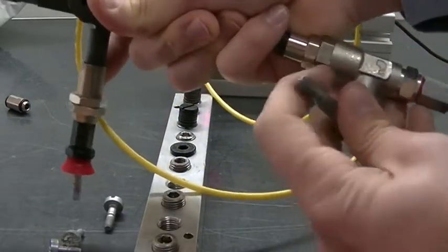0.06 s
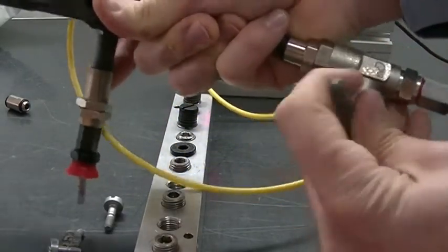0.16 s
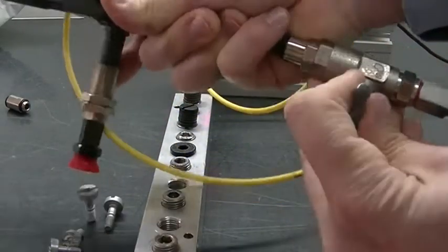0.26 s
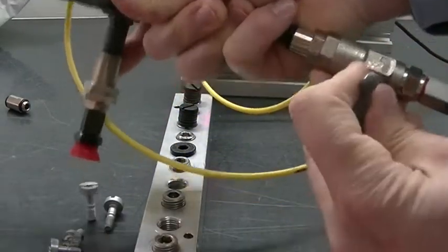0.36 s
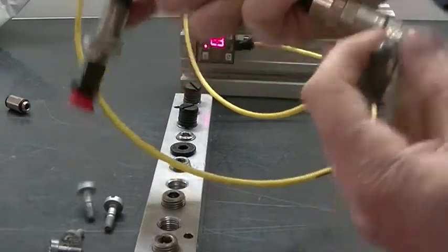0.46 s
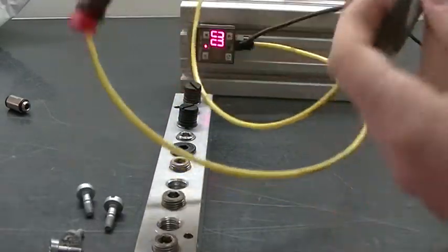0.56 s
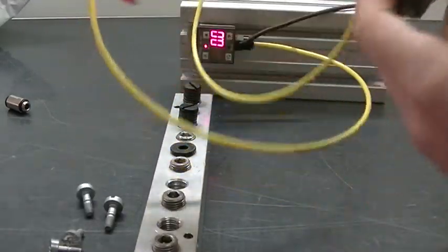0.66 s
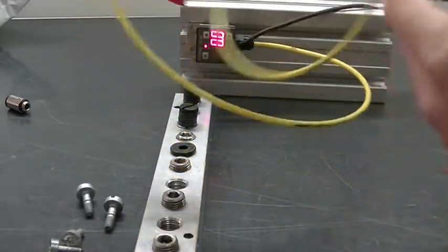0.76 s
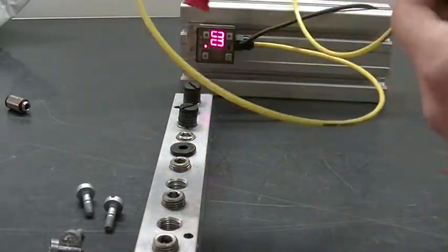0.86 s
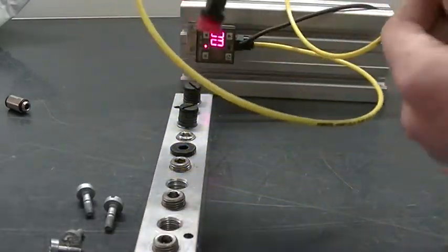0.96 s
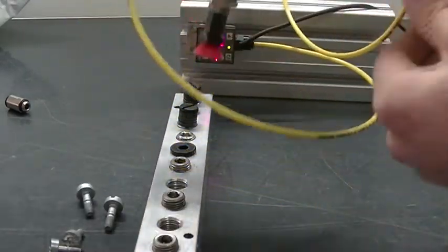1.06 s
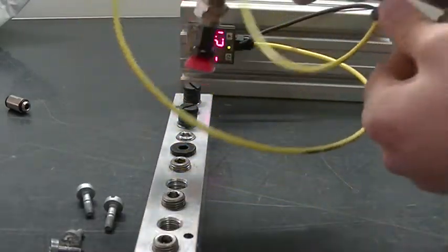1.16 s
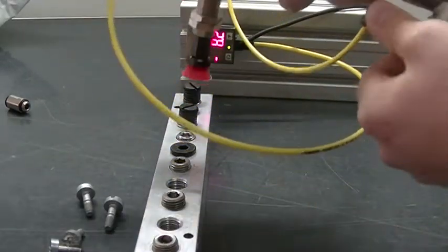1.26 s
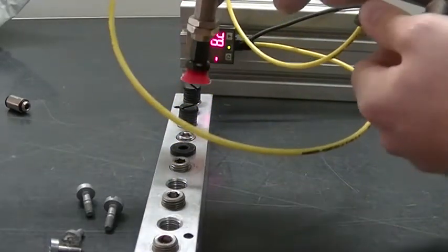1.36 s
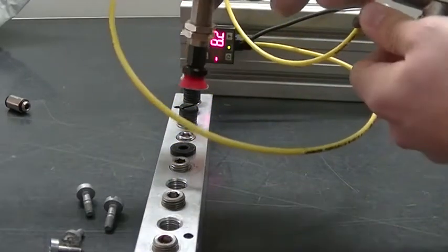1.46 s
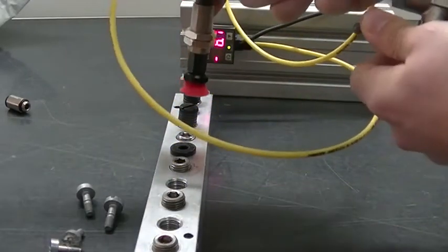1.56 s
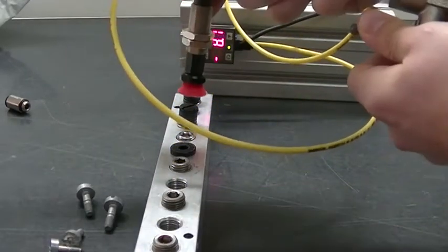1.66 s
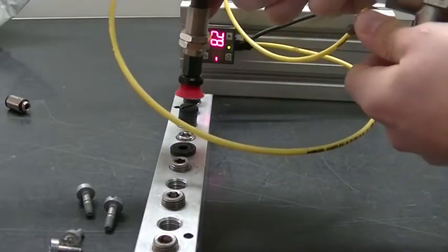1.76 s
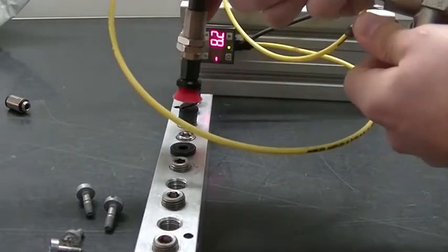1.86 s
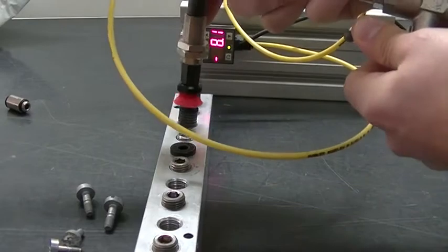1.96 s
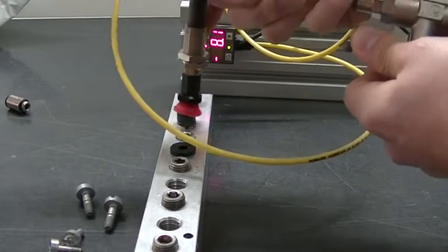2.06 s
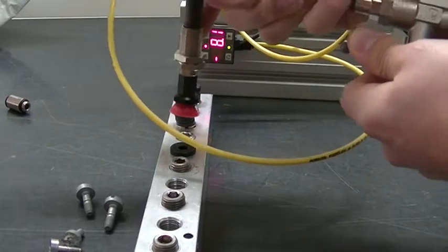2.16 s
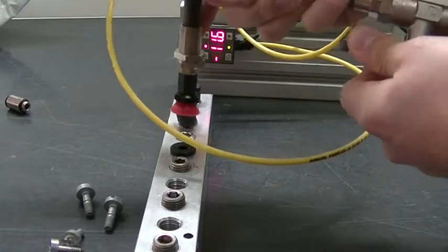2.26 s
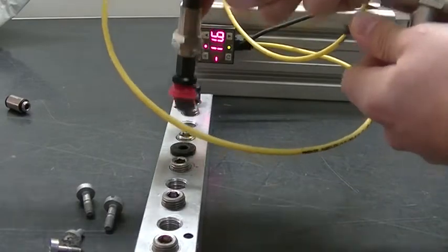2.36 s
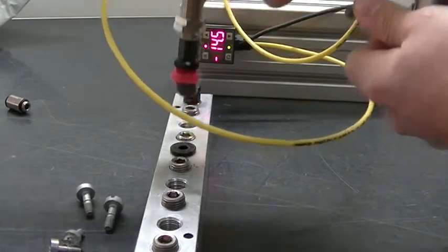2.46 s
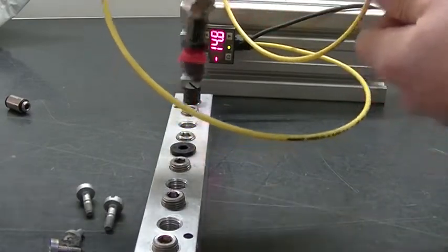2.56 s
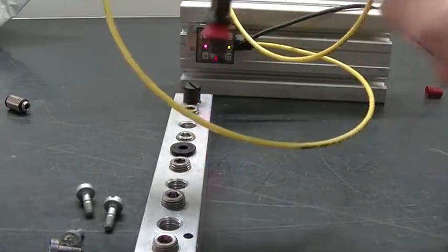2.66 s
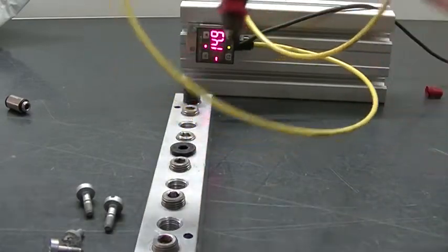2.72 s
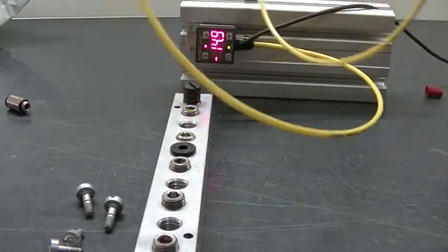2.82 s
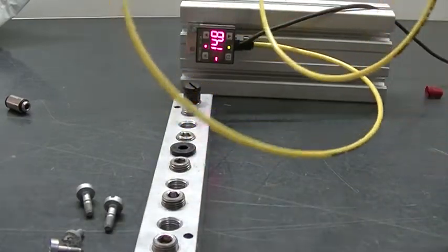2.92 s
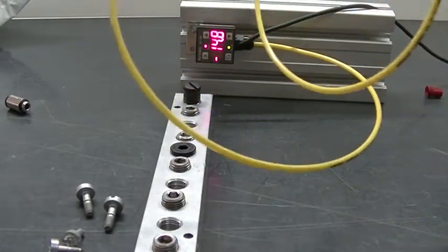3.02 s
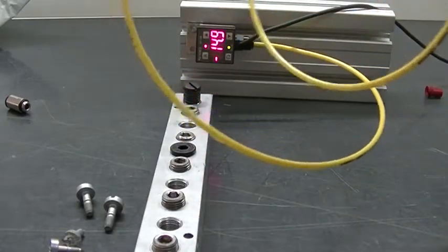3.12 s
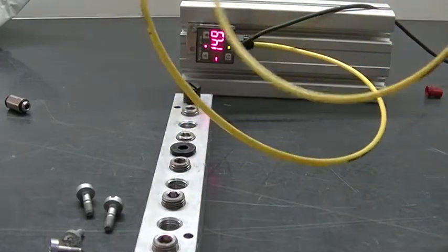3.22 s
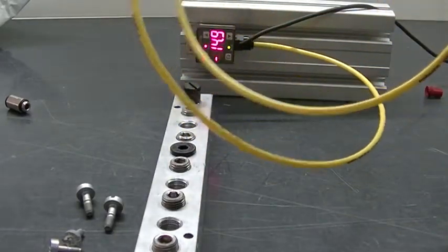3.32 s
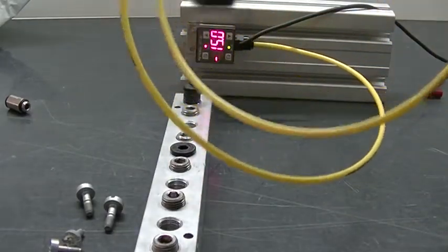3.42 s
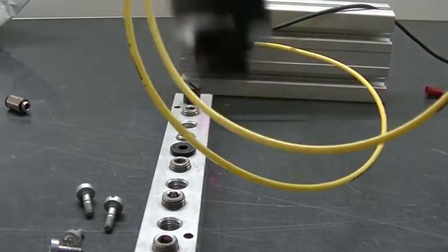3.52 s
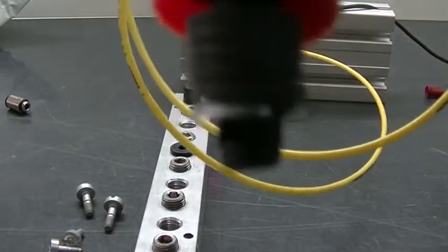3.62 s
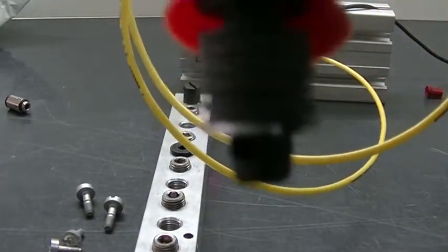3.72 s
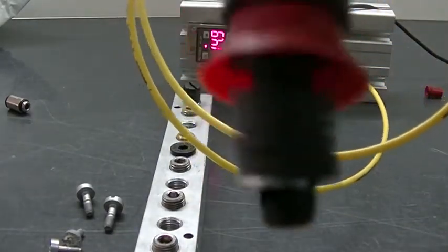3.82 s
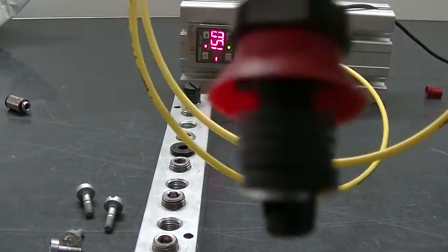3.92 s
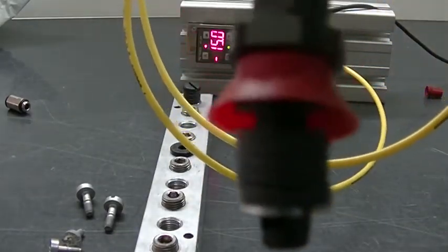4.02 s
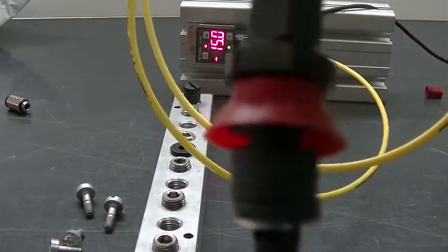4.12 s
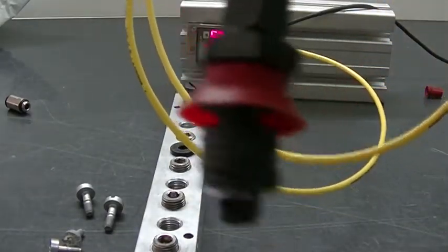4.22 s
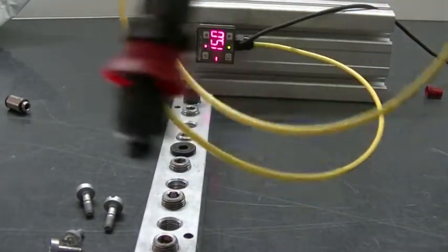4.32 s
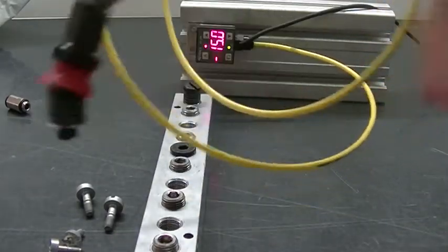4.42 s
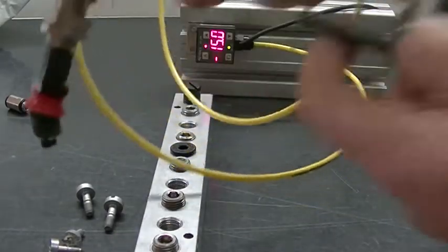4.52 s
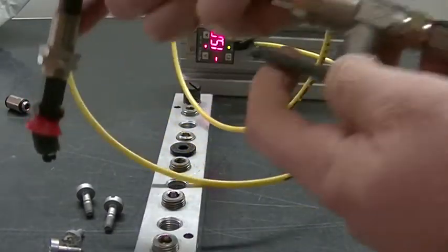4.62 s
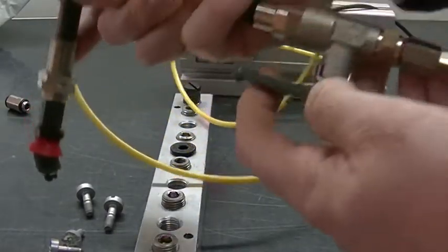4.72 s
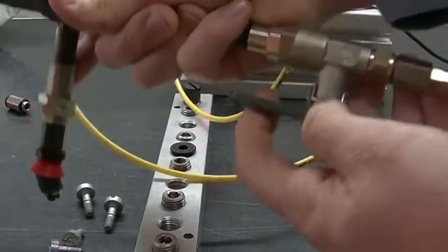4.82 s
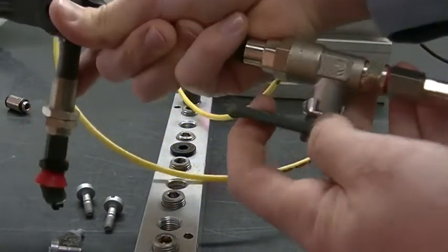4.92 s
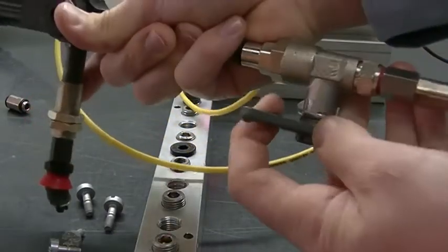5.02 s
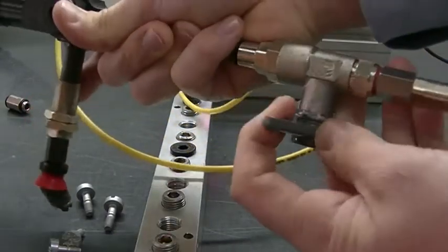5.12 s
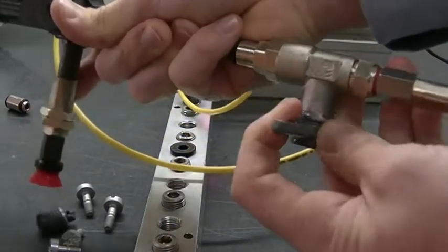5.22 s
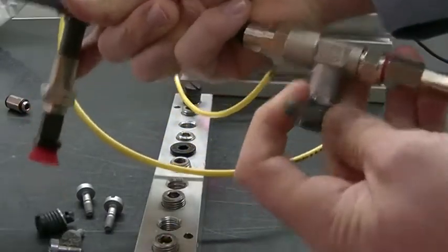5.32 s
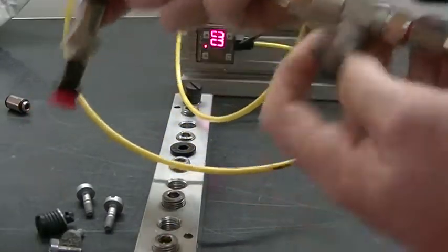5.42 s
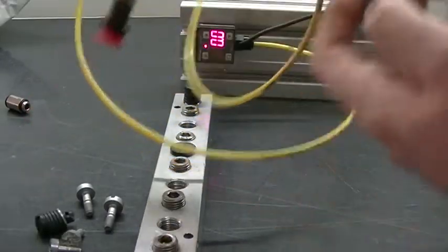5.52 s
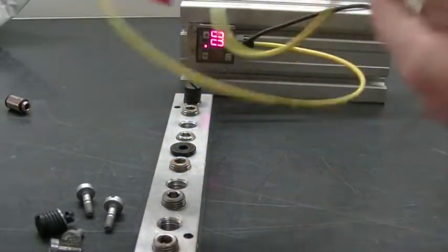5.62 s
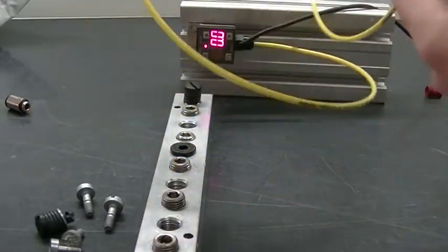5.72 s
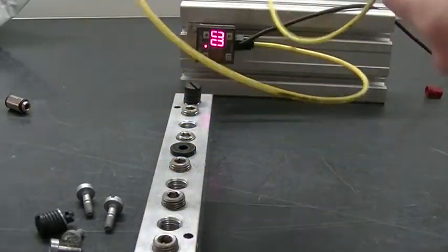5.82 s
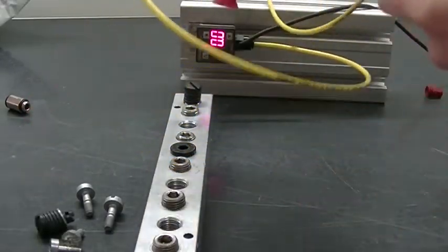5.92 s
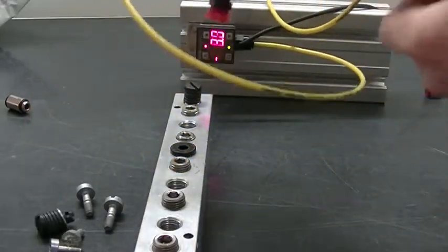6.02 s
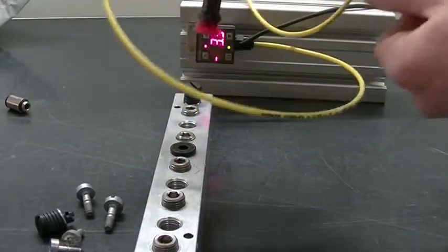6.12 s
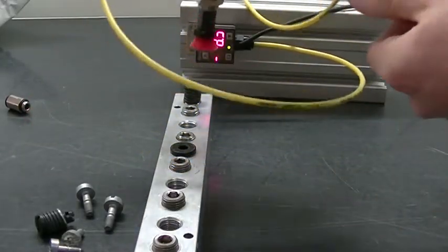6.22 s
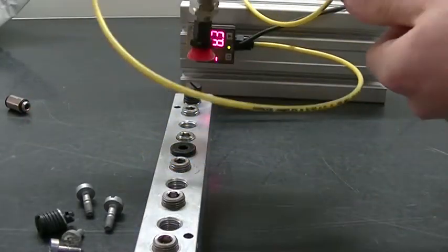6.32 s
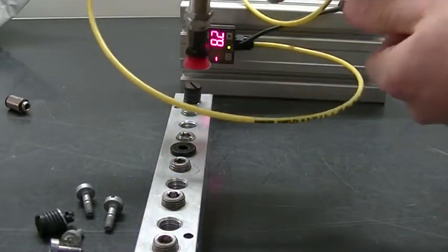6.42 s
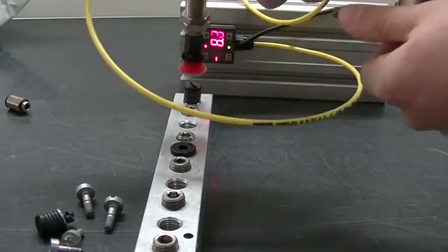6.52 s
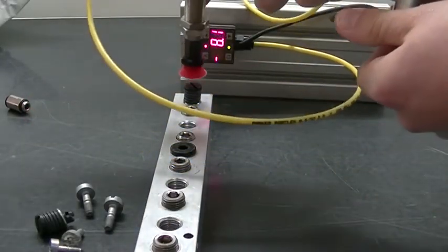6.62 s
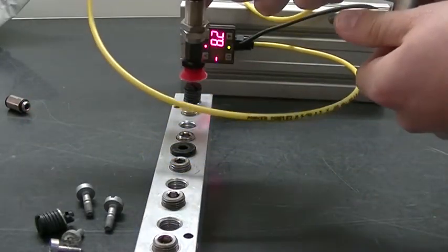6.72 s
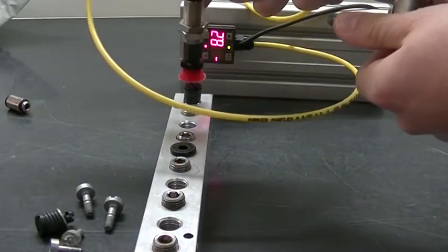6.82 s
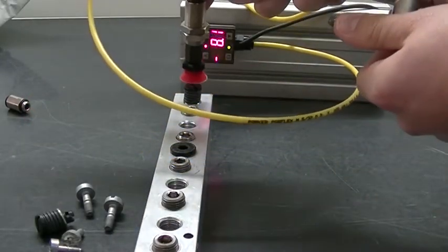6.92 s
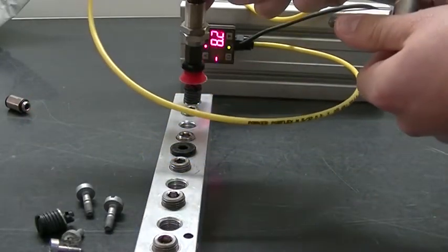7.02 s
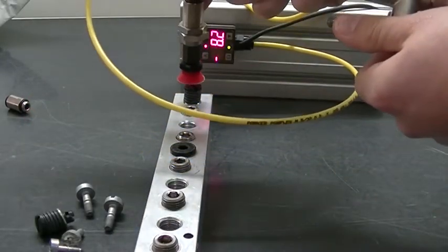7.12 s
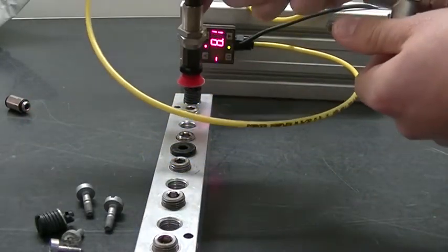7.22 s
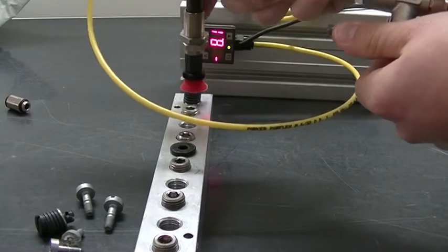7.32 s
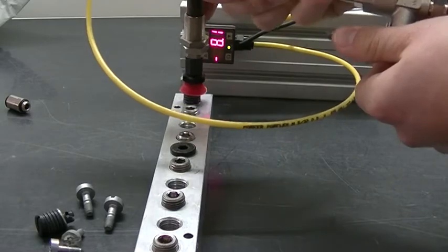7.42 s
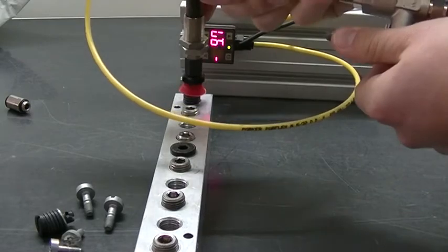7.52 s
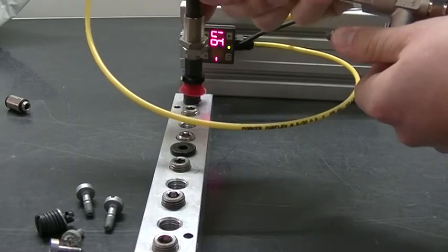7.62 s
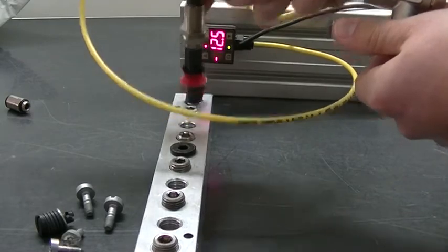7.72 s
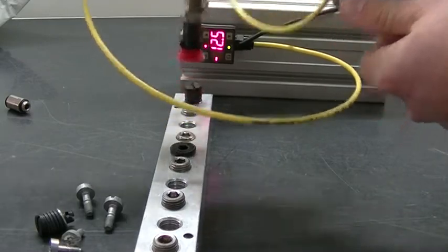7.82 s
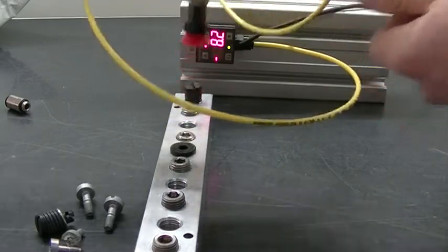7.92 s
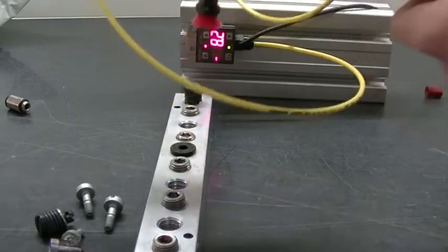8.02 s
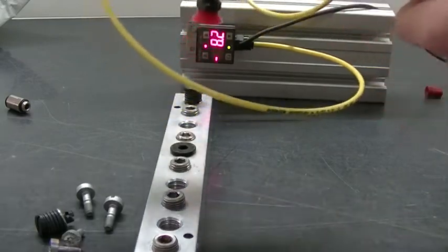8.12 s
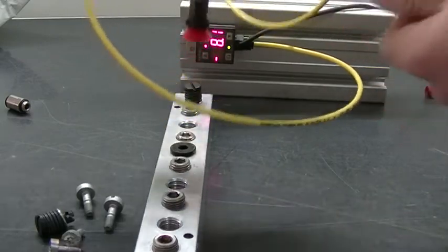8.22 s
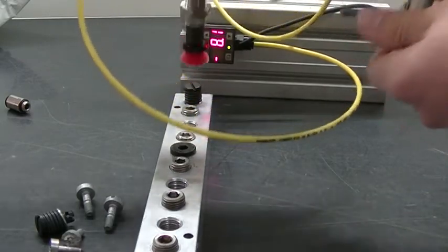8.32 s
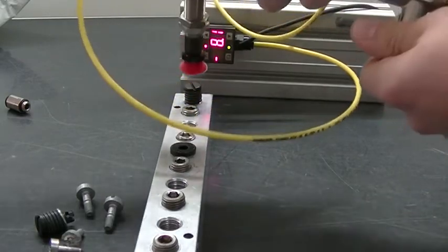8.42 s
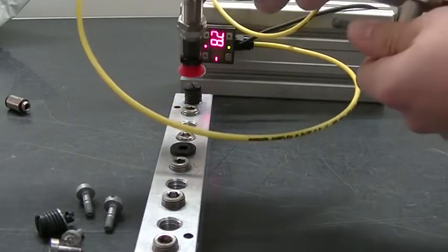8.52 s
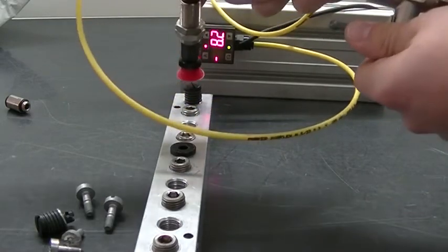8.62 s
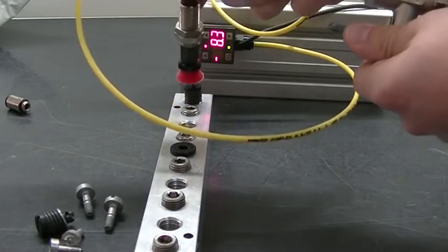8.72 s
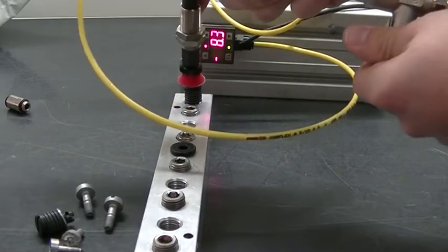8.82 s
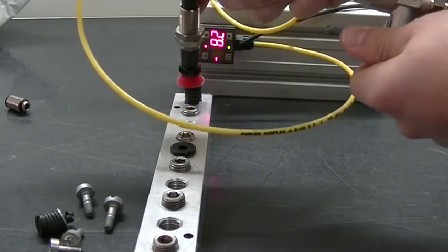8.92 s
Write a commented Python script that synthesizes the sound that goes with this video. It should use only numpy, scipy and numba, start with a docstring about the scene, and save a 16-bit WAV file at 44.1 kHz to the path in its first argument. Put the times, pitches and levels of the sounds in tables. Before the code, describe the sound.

Three bursts of loud air hiss from a suction cup tool, with a small part clattering onto the bench in each pause.

```python
"""Compressed air roars in bursts from a hand-held vacuum ejector above a workbench.
The turbulent exhaust is combed by moving echoes off bench and wall; air sizzles into the suction cup.
Twice the valve shuts: the hall rings out, and the part held by the cup drops and bounces.
Small steel parts click and the hose rustles in the pauses. Ventilation and mains hum lie beneath;
a compressor ducks the loud stretches."""
import sys
import numpy as np
from scipy import signal
from scipy.fft import rfft, irfft, next_fast_len
from scipy.io import wavfile
from numba import njit

SR = 44100
rng = np.random.default_rng(int(sys.argv[2]) if len(sys.argv) > 2 else 0)


def unload_audio(sound):
    """Save the sound as a 16-bit wav file, at the path given as the first command line argument."""
    columns = np.transpose(np.atleast_2d(sound))
    # keep every value between -1 and 1, then stretch to whole-number steps
    steps = np.round(np.clip(columns, -1, 1) * 32767)
    wavfile.write(sys.argv[1], SR, steps.astype(np.int16))


N = 395577
TIME = np.arange(N) / SR
WORK_HEIGHT_CM, WORK_WALL_CM = 6, 36  # working position of the ejector


def ejector(rush_db=-15, sizzle_db=-14, refill_db=-19, width_db=-1):
    """Exhaust and cup suction follow the air flow. Returns stereo near sound and mono source."""
    # cup inflow: freq_hz, level_db
    suction_spectrum = [(7000, -38), (9000, -14), (10800, 0), (12300, -1), (14000, -2), (15400, -3)]
    # part-open valve: freq_hz, level_db
    sizzle_spectrum = [(3000, -25.5), (7300, -14), (8300, 0), (9100, 0), (10000, -16), (11300, -14),
                       (15000, -30)]
    # colouring of the close hiss, several peaks and a dip at 1350 Hz: freq_hz, width_hz, gain_db
    colouring = [(460, 60, 2.5), (580, 38, 4), (760, 67, 2.3), (980, 75, 1.3), (1350, 200, -3.4),
                 (1900, 120, 2.2), (2125, 99, 4.5)]
    height_cm, wall_cm, lift, close = hand()
    seal, strain, leak = grip()
    flow, spurt, refill, bright_db = valve()
    roar_db = -10.2 - 0.1 * lift - 0.9 * seal
    low_db = -24.35 - 1.2 * lift - 3.4 * seal
    edge_db = -13.4 - 5.7 * lift - 3.2 * seal - 4.5 * strain + bright_db
    suction_db = -36.7 + 15.5 * close + 5 * leak
    pan_db = 2.35 + 1.3 * close  # left minus right
    thin = np.minimum(seal + 2 * spurt, 1)  # also thin until the pressure is up
    roar = undb(roar_db) * choke(exhaust(low_db, edge_db), thin)
    rush_band = noise([(2000, -39), (2950, 1.5), (3300, 0), (3900, 0), (5000, -35), (9000, -55)])
    rush = undb(rush_db) * strain * rush_band
    suction = undb(suction_db) * noise(suction_spectrum)
    sizzle = undb(sizzle_db) * spurt * noise(sizzle_spectrum)
    seep = undb(refill_db) * refill * suction  # air returns to the emptied hose
    hiss = flow * (roar + rush + suction) + sizzle + seep
    # treble scattered by the hands differs left and right
    side = undb(width_db) * shape(delay(hiss, ms=7.3), lambda hz: 0.62 * hz ** 2 / (hz ** 2 + 5000 ** 2))
    near = reflections(resonate(hiss, colouring), height_cm, wall_cm) + np.array([side, -side])
    return near * undb(np.array([pan_db, -pan_db]) / 2), hiss


def exhaust(low_db, edge_db, low_hz=540, edge_hz=5900, flutter_db=0.48):
    """Turbulent jet through the silencer; low band and treble edge are set re the mid band."""
    # jet: freq_hz, level_db
    jet_spectrum = [(50, -50), (140, -46), (215, -24), (300, -19.7), (420, -13.2), (620, -5.3), (850, 1),
                    (1300, 2.6), (2000, 2.2), (3400, -3.2), (5200, -3.8), (7200, -15.3), (9800, -27),
                    (15000, -49)]
    # pipe and silencer resonances: freq_hz, width_hz, gain_db
    pipe_peaks = [(3600, 200, 1.4), (5230, 300, 1), (10800, 300, 9)]
    jet = resonate(noise(jet_spectrum), pipe_peaks)
    low = shape(jet, lambda hz: 1 / (1 + (hz / low_hz) ** 8))
    edge = shape(jet, lambda hz: 1 - 1 / (1 + (hz / edge_hz) ** 14))
    roar = unit(jet - low - edge) + undb(low_db) * unit(low) + undb(edge_db) * unit(edge)
    return roar * undb(flutter_db * wander(rate_hz=60))


def choke(roar, amount):
    """With no air drawn through the cup, the jet runs thinner and higher."""
    # exhaust change when sealed: freq_hz, gain_db
    sealed = [(220, 4.5), (500, -3.5), (750, -1.7), (1150, -3.7), (2200, -3.1), (3300, 2.9), (4400, 1.8),
              (6000, -1.5), (9000, -3.4)]
    return (1 - amount) * roar + amount * shape(roar, lambda hz: undb(lookup(hz, sealed)))


def valve(open_s=0.034, crack_s=0.01, shut_s=0.0067, settle_s=0.026, throttle=0.65, refill_s=0.08):
    """Envelopes: air flow, spurt through the part-open valve, hose refill after shutting, brightness."""
    # air bursts: open_s, shut_s, level_db, edge_db
    bursts = [(-1, 0.1506, -2.2, -2), (0.9858, 5.071, 0, 1.0), (5.9485, 10, -0.1, -0.6)]
    flow, spurt, refill, edge_db = np.zeros((4, N))
    for start_s, end_s, level_db, bright_db in bursts:
        age_s, closed_s = np.maximum(TIME - start_s, 0), np.maximum(TIME - end_s, 0)
        gate = np.minimum(age_s / open_s, 1) * np.exp(-closed_s / shut_s)
        flow += undb(level_db) * gate
        crack = np.minimum(age_s / crack_s, 1) * np.exp(-age_s / settle_s)
        spurt += crack + throttle * (1 - undb(level_db)) * gate
        refill += (closed_s > 0) * np.exp(-closed_s / refill_s)
        edge_db += bright_db * gate
    return flow, spurt, refill, edge_db


def grip(seal_s=0.23, release_s=0.1, strain_after_s=0.18, strain_half_s=0.135):
    """The cup seals, the jet strains to empty the hose, the part-closed lip leaks; each 0-1."""
    # cup on a part: touch_s, release_s, tightness
    grips = [(-1, 0.2, 0.25), (2.03, 5.1, 1), (7.42, 7.68, .7)]
    seal, strain = np.zeros((2, N))
    for touch_s, let_go_s, tightness in grips:
        age_s = TIME - touch_s
        held = tightness * np.clip(1 - (TIME - let_go_s) / release_s, 0, 1)
        seal += held * np.clip(age_s / seal_s, 0, 1)
        strain += held * np.exp(-((age_s - strain_after_s) / strain_half_s) ** 2)
    seal = np.clip(seal, 0, 1)
    leak = seal * (1 - seal) ** 2  # peaks at a third closed
    return seal, strain, leak / leak.max()


def hand(turn_cm=4.3, start_s=2.42, approach_s=1.22, hold_s=0.42, retreat_s=0.4):
    """Lifting turns the exhaust away (lift 0-1); once the cup nears the listener (close 0-1)."""
    # ejector path: time_s, height_cm, wall_cm
    path = [(0.1, 5.1, 43.91), (1.03, 7.18, 39.99), (1.2, 6.32, 38.75), (1.45, 5.68, 38.57),
            (2.1, 5.44, 38.73), (2.45, 5.78, 39.34), (2.75, 7.48, 40.48), (3.0, 10.07, 49.19),
            (3.25, 14.28, 57.77), (3.55, 17.33, 64.78), (3.85, 19.42, 67.17), (4.2, 19.15, 65.0),
            (4.4, 12.43, 58.58), (4.6, 6.81, 45.9), (4.8, 5.41, 43.56), (5.04, 4.27, 41.44),
            (5.96, 6.86, 32.29), (6.2, 6.39, 34.2), (6.5, 5.58, 35.49), (7.35, 5.13, 34.85),
            (7.7, 4.83, 34.5), (7.92, 6.67, 37.58), (8.15, 7.42, 39.16), (8.45, 5.6, 37.98),
            (8.97, 4.91, 36.45)]
    time_s, *columns = np.transpose(path)
    height_cm, wall_cm = (np.interp(TIME, time_s, column) for column in columns)
    lift = np.tanh(np.maximum(height_cm - WORK_HEIGHT_CM, 0) / turn_cm)
    close = np.interp(TIME, np.cumsum([start_s, approach_s, hold_s, retreat_s]), [0, 1, 1, 0])
    return height_cm, wall_cm, lift, close


def reflections(x, height_cm, wall_cm, bench_hz=1300, bench_rad=0.2, dull_hz=7000, right_lag_ms=0.024):
    """Direct sound plus echoes whose lags follow the hand: a sweeping comb."""
    # wall, rail, fittings, hands: rest_lag_ms, relative_gain, height_slope, wall_slope (1 = flat mirror)
    surfaces = [(0.321, 0.115, 1.216, 0.202), (0.562, 0.065, -0.709, 0.57), (0.606, 0.116, 0.412, -0.151),
                (0.759, 0.09, -0.335, 1.161), (0.852, 0.048, -1.147, -0.13), (1.154, -0.06, -0.278, 0.498),
                (1.305, 0.054, 0.107, -0.056), (1.6, 0.112, 0.491, 0.65), (1.655, -0.075, -0.722, 0.963),
                (2.109, 0.195, 0.0, 1.0), (2.337, 0.164, -0.021, 0.934), (2.539, -0.072, 0.22, 0.653),
                (2.737, 0.071, 0.787, 0.691), (3.058, 0.052, -0.196, -0.312), (4.254, 0.039, -0.993, 0.402),
                (5.147, 0.049, 1.011, 0.603), (5.266, 0.059, 1.212, 0.633)]
    sound_cm_per_ms = 34.3
    bench_ms, rest_ms = 2 * height_cm / sound_cm_per_ms, 2 * WORK_HEIGHT_CM / sound_cm_per_ms
    up_ms, away_ms = bench_ms - rest_ms, 2 * (wall_cm - WORK_WALL_CM) / sound_cm_per_ms
    # clutter scatters the treble; bass passes round the small bench fixture
    dull = shape(x, lambda hz: 1 / (1 + (hz / dull_hz) ** 4))
    thin = shape(dull, lambda hz: np.exp(-1j * bench_rad) * hz ** 2 / np.hypot(hz ** 2, bench_hz ** 2))
    echoes = 0.3 * echo(thin, rest_ms, bench_ms)
    for lag_ms, gain, height_slope, wall_slope in surfaces:
        echoes += gain * echo(dull, lag_ms, lag_ms + height_slope * up_ms + wall_slope * away_ms)
    return x + undb(3) * np.array([delay(echoes, -right_lag_ms / 2), delay(echoes, right_lag_ms / 2)])


def echo(x, rest_ms, lag_ms, direct_ms=1.0):
    """Moving reflection, weaker as its detour grows."""
    return delay(x, lag_ms) * (direct_ms + rest_ms) / (direct_ms + np.maximum(lag_ms, 0))


def contacts():
    """Landings and clicks as start_s, thud_db, tick_db, ring_db; levels relative within each layer."""
    # dropped part bouncing on the bench: start_s, level_db, tick_offset_db
    landings = [(0.2432, 0, 0.5), (0.2664, -17, -15), (0.4920, -3, 5), (0.5175, -12.5, -5.5),
                (5.1913, 1.5, -0.5), (5.2063, -18, 2), (5.2172, -4, 2)]
    # sharp click of the valve shutting, faint clicks of small steel parts: start_s, tick_db, ring_db
    clicks = [(0.629, -30, -58), (0.760, -37, -62), (0.773, -37, -62), (0.808, -27, -44), (5.0677, 0, -50),
              (5.5433, -20, -48), (5.6566, -28, -56), (5.7045, -28, -60), (5.8355, -24.5, -29)]
    rows = [(start_s, db, db + offset_db, db - 41) for start_s, db, offset_db in landings]
    return rows + [(start_s, db - 11, db, ring_db) for start_s, db, ring_db in clicks]


def impacts(tick_gain_db=14, scatter_db=-19, scatter_s=0.0017, low_cut_hz=900, early_db=-38, early_s=0.019):
    """Each contact gives a hard tick, a bench thud and a steel ring."""
    # bench top: freq_hz, level_db, t60_s
    bench_modes = [(475, -34, .05), (830, -22, 0.033), (1560, -12.5, 0.028), (1960, 0.5, 0.0052),
                   (2330, -15, 0.012), (3050, -9, 0.0055), (4400, -4, 0.0022), (6900, -5, 0.0016)]
    # small steel parts: freq_hz, level_db, t60_s
    steel_modes = [(5850, -6, .072), (6621, -4, 0.057), (8651, -7, .029), (12280, -18, .038)]
    # hard contact: freq_hz, level_db
    tick_spectrum = [(200, -23), (1500, -8), (4000, -1), (7500, -1.5), (9500, -14), (15000, -14)]
    t = np.arange(SR // 5) / SR
    thuds, ticks, rings = np.zeros((3, N))
    bench, steel = ring(bench_modes, t), ring(steel_modes, t)
    for start_s, thud_db, tick_db, ring_db in contacts():
        # impulse, then scatter off nearby objects
        tick = undb(scatter_db) * rng.standard_normal(len(t)) * np.exp(-t / scatter_s)
        tick[0] = 1
        span = slice(int(start_s * SR), int(start_s * SR) + len(t))
        thuds[span] += undb(thud_db) * bench
        ticks[span] += undb(tick_db) * tick
        rings[span] += undb(ring_db) * steel
    early_echoes = rng.standard_normal(len(t)) * np.exp(-t / early_s) * (t > scatter_s)
    thuds += undb(early_db) * convolve(thuds, early_echoes)
    # a light part hardly drives the bench's bass
    thuds = signal.sosfilt(signal.butter(1, low_cut_hz, "high", fs=SR, output="sos"), thuds)
    return thuds + shape(ticks, lambda hz: undb(tick_gain_db + lookup(hz, tick_spectrum))) + rings


def ring(modes, t):
    """Damped sines after a blow."""
    return sum(undb(db - 60 * t / t60_s) * np.sin(2 * np.pi * hz * t) for hz, db, t60_s in modes)


def rustle(uneven_db=2):
    """Hose and sleeve rub unevenly through the hands."""
    # slides: centre_s, half_length_s, level_db
    slides = [(0.66, .09, -62), (0.77, 0.011, -45), (5.76, 0.18, -55.5)]
    swells = sum(undb(db) * np.exp(-((TIME - centre_s) / half_s) ** 2) for centre_s, half_s, db in slides)
    envelope = swells * undb(uneven_db * wander(rate_hz=50))
    return envelope * noise([(300, -15), (2000, 0), (5000, 0), (9000, -5), (15000, -11)])


def hall(x, onset_s=0.012):
    """Diffuse workshop tail; the treble dies first."""
    # reverberation: freq_hz, t60_s, level_db
    decay = [(150, 1, -2), (600, 1.07, -1.5), (1600, 1.25, -0.5), (4000, 0.96, -1), (7000, .6, -4.5),
             (14000, .35, -3.5)]
    hz, t, cells = signal.stft(rng.standard_normal((2, SR)), SR, nperseg=256)
    fade_db = lookup(hz, decay, column=2)[:, None] - 60 * t / lookup(hz, decay)[:, None]
    responses = signal.istft(cells * undb(fade_db) * (t > onset_s), SR)[1]
    return stereo(*(convolve(x, response / np.linalg.norm(response)) for response in responses))


def background(vent_db=-50, hum_hz=118.7, hum_db=-59, waver_db=3):
    """Ventilation noise and wavering mains hum."""
    # ventilation: freq_hz, level_db
    vent_spectrum = [(25, -17), (60, -7), (120, -2.5), (220, -3), (430, 0), (700, -7.5), (1500, -15),
                     (3000, -18.5), (6000, -25.5), (15000, -37)]
    hum = undb(hum_db + waver_db * wander(rate_hz=12)) * np.sqrt(2) * np.sin(2 * np.pi * hum_hz * TIME)
    return undb(vent_db) * stereo(noise(vent_spectrum), noise(vent_spectrum)) + hum


def stereo(mid, side, apart_hz=4500):
    """Diffuse field: channels alike in the bass, unrelated in the treble."""
    side = shape(side, lambda hz: np.clip(hz / apart_hz, 0.2, 1))
    return np.array([mid + side, mid - side])


def undb(db):
    """Decibels to gain."""
    return 10 ** (np.asarray(db) / 20)


def unit(x):
    """Scale to rms 1."""
    return x / np.sqrt(np.mean(x ** 2))


def lookup(hz, table, column=1):
    """Interpolate a column over log frequency."""
    table = np.array(table)
    return np.interp(np.log(hz + 1), np.log(table[:, 0]), table[:, column])


def shape(x, gain):
    """Filter by gain(hz)."""
    size = next_fast_len(N + 4096)
    return irfft(rfft(x, size) * gain(np.fft.rfftfreq(size, 1 / SR)), size)[:N]


def noise(spectrum):
    """Noise of rms 1 from rows of freq_hz, level_db."""
    return unit(shape(rng.standard_normal(N), lambda hz: undb(lookup(hz, spectrum))))


def resonate(x, peaks):
    """Filter by rows of freq_hz, width_hz, gain_db."""
    return shape(x, lambda hz: undb(sum(db / (1 + (2 * (hz - f) / w) ** 2) for f, w, db in peaks)))


def delay(x, ms):
    """Fixed or moving lag."""
    return np.interp(TIME - ms / 1000, TIME, x, left=0)


def convolve(x, response):
    """Apply an impulse response."""
    return signal.oaconvolve(x, response)[:N]


def wander(rate_hz):
    """Random curve, spread near 1."""
    return np.interp(TIME * rate_hz, np.arange(10 * rate_hz), rng.standard_normal(10 * rate_hz))


@njit
def follow(x, attack, release):
    """Envelope follower; coefficients per sample."""
    envelope, level = np.empty(len(x)), 1.7 * x[:2000].mean()
    for i in range(len(x)):
        level += (x[i] - level) * (attack if x[i] > level else release)
        envelope[i] = level
    return envelope


def scene(hiss_wet_db=-20.5, knock_wet_db=-24, left_db=1.2, background_left_db=0.6):
    """Ejector and falling parts close by; hall, ventilation and hum behind."""
    near, hiss = ejector()
    knocks = impacts() + rustle()
    tail = hall(undb(hiss_wet_db) * hiss + undb(knock_wet_db) * knocks)
    room_tone = background() * undb([[background_left_db], [-background_left_db]])
    return near + (knocks + tail) * undb([[left_db], [-left_db]]) + room_tone


def record(dry, knee_db=-13.0, ratio=2.46, attack_s=0.006, release_s=0.18, top_hz=15400):
    """Compressor ducks under the hiss and recovers in the pauses; peaks clip, the top is cut."""
    envelope = follow(np.abs(dry).mean(axis=0), 1 / (attack_s * SR), 1 / (release_s * SR))
    gain = np.minimum(undb(knee_db) / (envelope + 1e-9), 1) ** (1 - 1 / ratio)
    lowpass = signal.ellip(10, 0.2, 70, top_hz, fs=SR, output="sos")
    return signal.sosfilt(lowpass, np.clip(dry * gain, -1, 1))


dry = scene()
out = record(dry)
unload_audio(out)
```